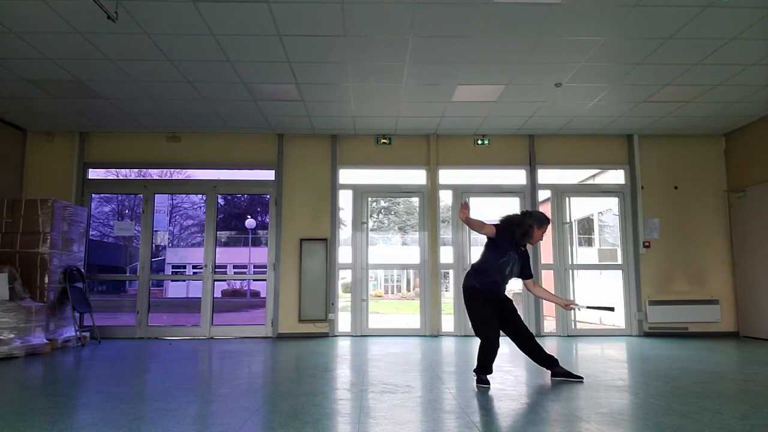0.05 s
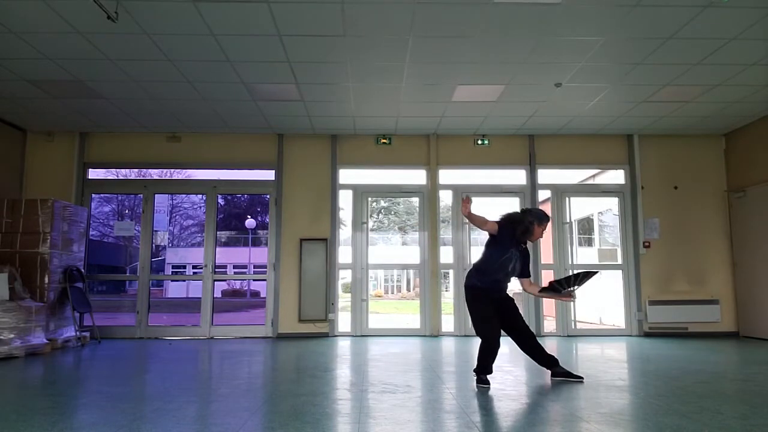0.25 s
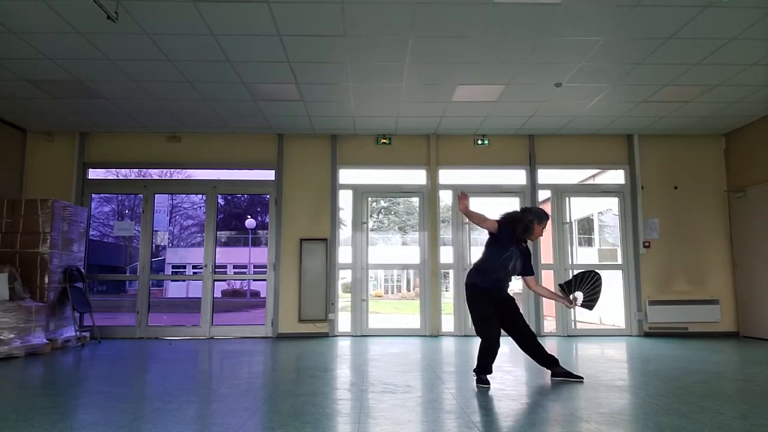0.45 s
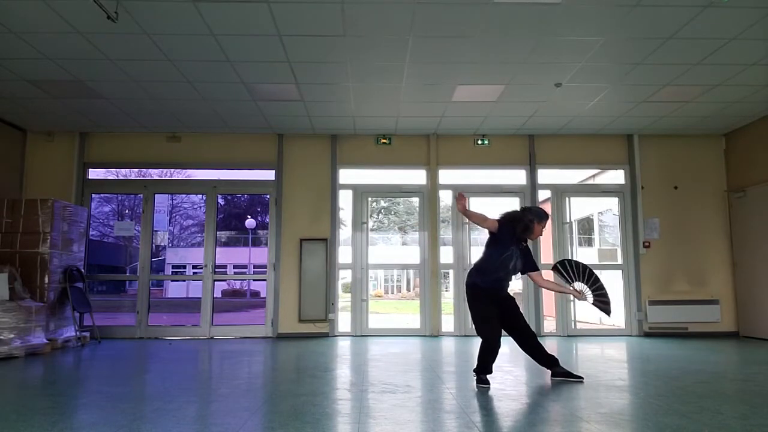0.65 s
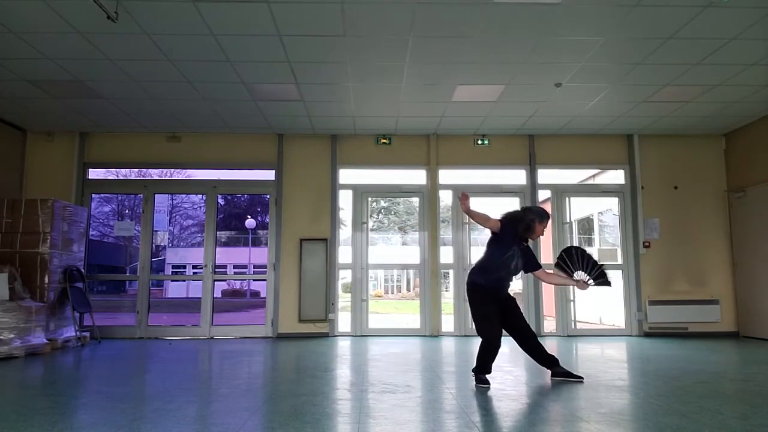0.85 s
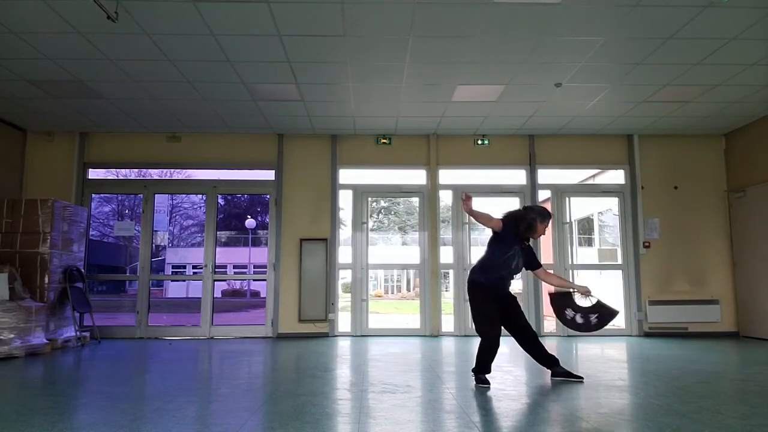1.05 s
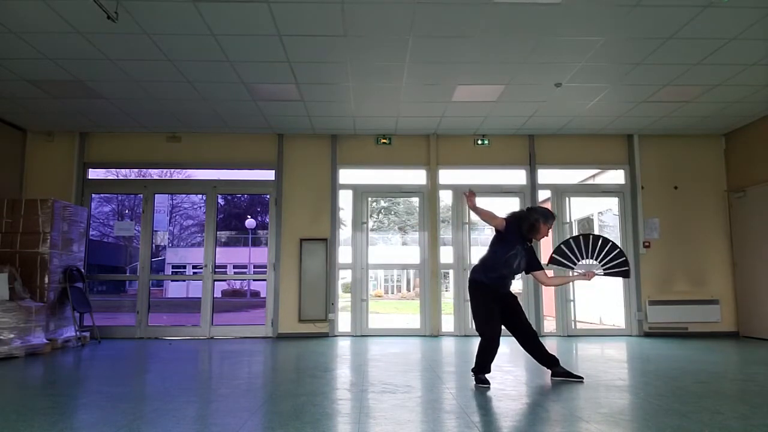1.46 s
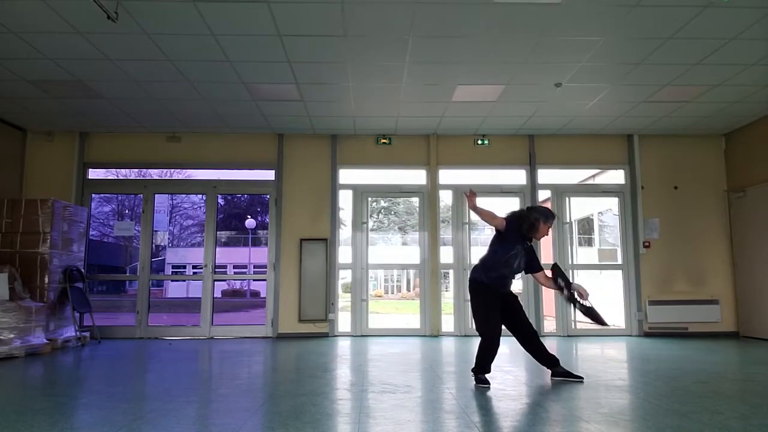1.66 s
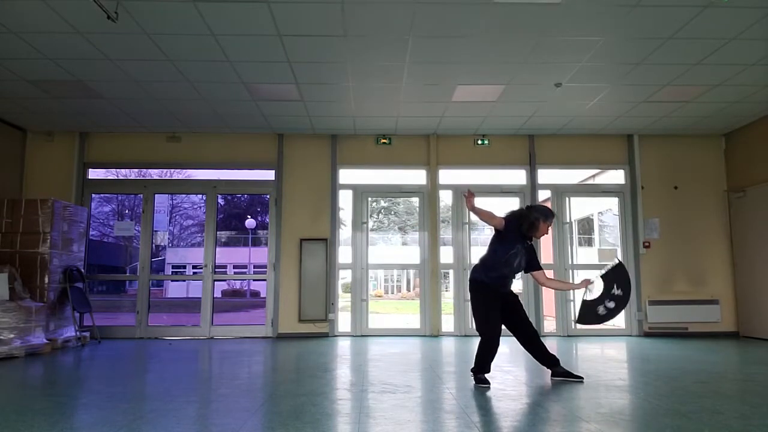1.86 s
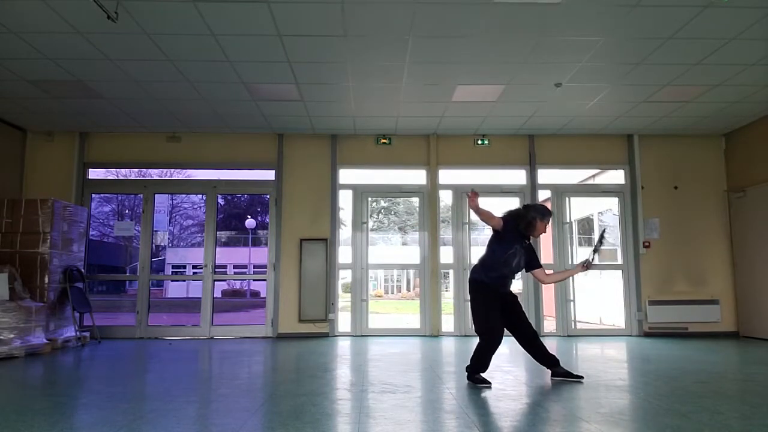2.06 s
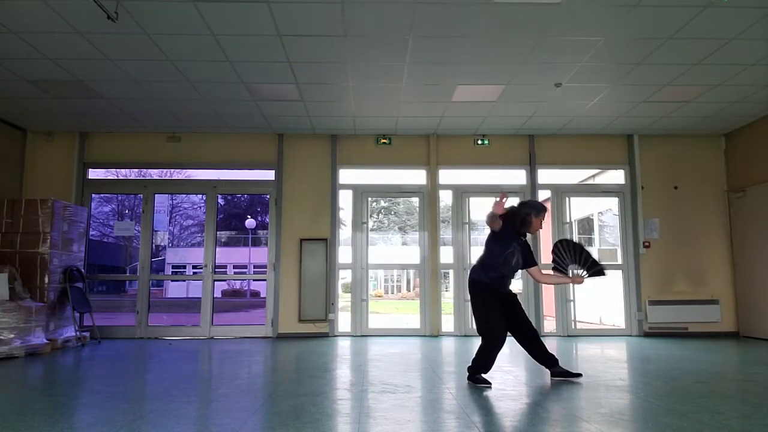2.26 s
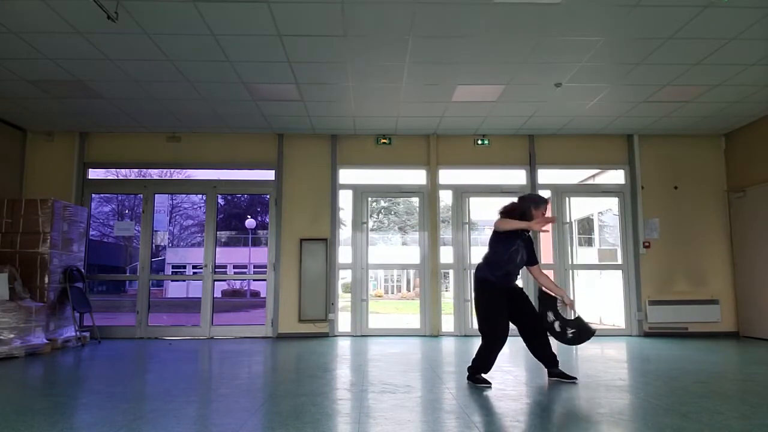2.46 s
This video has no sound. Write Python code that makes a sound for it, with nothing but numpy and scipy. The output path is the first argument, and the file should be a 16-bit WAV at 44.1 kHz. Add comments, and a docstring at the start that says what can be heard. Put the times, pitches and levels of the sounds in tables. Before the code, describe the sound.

A large folding fan snaps open at about 0.2 to 0.4 seconds, with a quick, loud run of rib clacks and a cloth rasp, ringing briefly in an empty hall. It then swishes and ticks very faintly, its cloth flapping softly at about 1.3 and 2.2 seconds. The fan is a few metres away, slightly right. A quiet low rumble continues underneath, with soft low bumps mostly after 1.9 seconds.

```python
"""A low steady rumble fills an empty hall, and almost at once a large folding fan is flicked open:
its ribs clack against their stops one after another and the cloth cracks taut.
The open fan is swung to and fro, swishing and ticking faintly, and its leaf flaps over twice.
The hall rings after each sound of the fan; a few soft low bumps lie underneath."""
import sys
import numpy as np
from scipy import signal
from scipy.fft import rfft, irfft
from scipy.io import wavfile
from scipy.ndimage import uniform_filter1d

SR = 44100
rng = np.random.default_rng(int(sys.argv[2]) if len(sys.argv) > 2 else 0)


def master_out(mix):
    """Clip the mix to full scale and print it as 16-bit PCM to the path in sys.argv[1]."""
    frames = np.transpose(np.atleast_2d(mix))
    ceiling = np.clip(frames, -1, 1)
    pcm = np.round(ceiling * 32767).astype(np.int16)
    wavfile.write(sys.argv[1], SR, pcm)


N = 110250
T = np.arange(N) / SR


def amp(db):
    return 10 ** (np.asarray(db) / 20)


def at_hz(points, hz):
    """Read a table on a log-frequency axis."""
    freqs, values = np.transpose(points)
    return np.interp(np.log(np.maximum(hz, 1)), np.log(freqs), values)


def click(start):
    """A unit impulse at a time in seconds."""
    out = np.full(N, 1e-18)
    out[int(np.clip(start * SR, 0, N - 1))] = 1
    return out


def delay(x, seconds):
    """The same sound, later."""
    return np.interp(T - seconds, T, x, left=0)


def ring(x, hz, t60):
    """A resonator: a unit click sets off a sine of height 1 that falls 60 dB in t60 seconds."""
    radius, angle = amp(-60 / (t60 * SR)), 2 * np.pi * hz / SR
    return signal.lfilter([0, np.sin(angle)], [1, -2 * radius * np.cos(angle), radius ** 2], x)


def burst(peak, rise, t60):
    """An envelope that swells up to its peak time and dies away."""
    out = np.zeros(N)
    near = slice(*np.searchsorted(T, [peak - 10 * rise, peak + 2 * t60]))
    age = T[near] - peak
    out[near] = np.exp(-(np.minimum(age, 0) / rise) ** 2 - np.log(1000) * np.maximum(age, 0) / t60)
    return out + 1e-12


def noise(spectrum):
    """Coloured noise of rms 1."""
    colour = amp(at_hz(spectrum, np.fft.rfftfreq(N, 1 / SR)))
    x = irfft(rfft(rng.standard_normal(N)) * colour, N)
    return x / x.std()


# The hall's stereo image. Each row: frequency in Hz, left-right correlation.
STEREO_LIKENESS = [(60, 0.99), (180, .93), (300, .7), (520, 0.84), (1100, 0.33), (2200, -.25), (5000, 0),
                   (12000, 0)]

def diffuse(spectrum, size):
    """Spectra of a left and a right noise, alike in the bass and unrelated in the treble."""
    hz = np.fft.rfftfreq(size, 1 / SR)
    alike = np.clip(at_hz(STEREO_LIKENESS, hz), -1, 1)
    mid, side = rfft(rng.standard_normal((2, size)))
    pair = np.sqrt((1 + alike) / 2) * mid + np.sqrt((1 - alike) / 2) * side * [[1], [-1]]
    return amp(at_hz(spectrum, hz)) * pair


# The two colours of the room tone. Each row: frequency in Hz, relative noise density in dB.
RUMBLE_COLOUR = [(25, -24.5), (48, -8), (72, -4), (115, -8), (165, -17.5), (245, -16.5), (330, -24.5),
                 (480, -36), (800, -44), (1500, -48.5), (5000, -66.5), (15000, -61)]
HISS_COLOUR = [(500, 6), (2000, 0.5), (6000, -9.5), (12000, -7)]
RUMBLE_DB, HISS_DB = -57.5, -80.5

def rumble():
    """The steady low bed of the building, with a faint hiss on top."""
    low = irfft(diffuse(RUMBLE_COLOUR, size=N), N)
    hiss = np.array([noise(HISS_COLOUR), noise(HISS_COLOUR)])
    return amp(RUMBLE_DB) * low / low.std() + amp(HISS_DB) * hiss


# Bumps under the action. Each row: start in seconds, level in dB.
LOW_BUMPS = [(0.026, -51.5), (1.923, -52), (2.202, -47), (2.335, -41.5)]

def bumps():
    """Soft pushes ring one deep, muffled note, like weight shifting on a floor."""
    pushes = sum(amp(db) * click(start) for start, db in LOW_BUMPS)
    return signal.lfilter(*signal.butter(2, 150, fs=SR), ring(pushes, hz=67.4, t60=0.18))


# Swings of the fan. Each row: centre and width in seconds, relative air and rustle levels in dB.
FAN_SWINGS = [(.175, 0.026, -69.5, -70.5), (0.824, 0.015, -75, -68.5), (1.205, .035, -63, -75),
              (1.26, .03, -93, -86), (1.314, 0.0034, -61.5, -80.5), (1.35, .03, -60.5, -74),
              (1.92, .06, -69, -84), (2.03, 0.048, -91, -80.5), (2.201, 0.05, -67.5, -80.5),
              (2.35, 0.032, -69, -85.5), (2.5, .025, -66.5, -74)]
# Dark air and crisp cloth. Each row: frequency in Hz, relative noise density in dB.
AIR_COLOUR = [(100, 3.5), (300, 9.5), (600, -6), (1000, -7), (2200, -10), (5000, -29), (15000, -39)]
RUSTLE_COLOUR = [(500, -5), (3000, 2.5), (5000, -1.5), (7500, -5.5), (11000, 7.5), (15500, -2)]

def swishes():
    """Air and cloth noise swell and fade with each swing."""
    air, rustle = noise(AIR_COLOUR), noise(RUSTLE_COLOUR)
    out = 0
    for centre, width, air_db, rustle_db in FAN_SWINGS:
        swell = np.exp(-0.5 * ((T - centre) / width) ** 2)
        out += swell * (amp(air_db - 2.5) * air + amp(rustle_db + 0.5) * rustle)
    return out


# Flaps of the leaf. Each row: start in seconds, level in dB, pop pitch in Hz, slap trim in dB,
# slap low-pass in Hz, slap T60 in seconds.
LEAF_FLAPS = [(.200, -42.5, 260, 3, 2800, 0.027), (.211, -32, 407, -2, 1100, 0.058),
              (1.3275, -34, 164, -13.5, 2192, 0.028), (1.332, -40, 214.3, 3, 2486, 0.019),
              (1.335, -50, 299, 17, 5990, 0.02), (1.355, -38.5, 280.5, -25, 1983, 0.04),
              (1.366, -48.5, 408, 4, 6000, 0.058), (1.390, -50.5, 389.7, 9, 2990, 0.049),
              (2.183, -60, 187.2, -3.5, 2200, .06), (2.2012, -37, 233, -13.5, 1211, 0.064)]
# The slap's colour. Each row: frequency in Hz, relative noise density in dB.
SLAP_COLOUR = [(150, -1), (420, -2), (650, -5), (1100, 2), (1700, -5.5), (3200, -16.5), (4600, -23),
               (6000, -34), (15000, -37)]

def flaps():
    """The leaf bellies over with a low pop and a dull slap."""
    cloth = noise(SLAP_COLOUR)
    pops = slaps = 0
    for start, db, pop_hz, slap_db, bright_hz, slap_t60 in LEAF_FLAPS:
        pops += amp(db) * ring(click(start), pop_hz, t60=0.03)
        slap = amp(db + slap_db - 4.5) * cloth * burst(start, rise=0.001, t60=slap_t60)
        slaps += signal.lfilter(*signal.butter(2, bright_hz, fs=SR), slap)
    return signal.sosfilt(signal.butter(2, [110, 900], "band", fs=SR, output="sos"), pops) + slaps


# Tugs on the cloth. Each row: peak time in seconds, relative level in dB, rise and T60 in seconds.
CLOTH_RASPS = [(0.204, -65, .003, 0.6), (.247, -40, .002, 0.26), (.291, -37.5, .004, 0.21),
               (.326, -24.5, 0.0012, 0.03), (.349, -35, .004, 0.02), (0.3635, -35, .002, 0.019)]
# The rasp's colour. Each row: frequency in Hz, relative noise density in dB.
RASP_COLOUR = [(100, -26), (500, -1.5), (1500, -6), (3000, 10), (5500, 0.5), (7500, -8), (11000, -1.5),
               (15500, -5.5)]
RASP_GRAIN_DB = 2

def rasps():
    """The cloth gives bright, grainy rasps as its pleats pull taut."""
    flicker = uniform_filter1d(rng.standard_normal(N), size=20)
    grain = amp(RASP_GRAIN_DB * np.tanh(flicker / flicker.std()))
    tugs = sum(amp(db + 5.5) * burst(peak, rise, t60) for peak, db, rise, t60 in CLOTH_RASPS)
    return noise(RASP_COLOUR) * grain * tugs


# Ribs hitting their stops. Each row: start in seconds, level in dB, the rib's own pitch in Hz,
# contact hardness as a low-pass in Hz, rebound in seconds, thump trim in dB, left minus right in dB.
RIB_HITS = [(0.2375, -7.5, 1020, 3770, 0.00065, -12, -6), (0.2449, -7, 1150, 4044, 0.00071, 7, -2.5),
            (0.2685, -2, 1720, 2976, 0.00079, 8, -5.5), (0.2881, -25, 915, 2484, 0.00029, 14, -4.5),
            (.2895, -15.5, 1700, 3215, 0.00036, 23.5, -8.5), (0.3074, -8, 1400, 4000, .00075, 2, -4.5),
            (0.3226, -5.5, 1350, 4200, 0.00071, 2.5, -4), (0.3419, -4.5, 3164, 6500, .00063, -5, -3),
            (0.3588, 0, 1456, 4600, .0008, 3, -4.5), (0.3733, -3.5, 1700, 2657, 0.00051, -8.5, -2)]
# The clack and thump that all ribs share. Each row: frequency in Hz, gain in dB, T60 in seconds.
CLACK_MODES = [(972.22, -6, 0.0062), (1490, -17, 0.015), (1930, -8, 0.005), (2450, 0, 0.0023),
               (4000, -18, 0.0034), (4850, -15.5, .005)]
THUMP_MODES = [(250, -27.5, .03), (432, -17, .02)]
FIRST_TOUCH_DB, CHATTER_DB, OWN_RING_DB = -10.5, -24, -3

def rib(start, db, pitch_hz, hard_hz, rebound_s, thump_db, pan_db):
    """A rib touches lightly, seats and chatters; it rings briefly and jerks a thump from its pleat."""
    seated = start + rebound_s
    blow = amp(FIRST_TOUCH_DB) * click(start) + click(seated)
    chatter = amp(CHATTER_DB) * rng.standard_normal(N) * burst(seated, rise=0.00017, t60=0.014)
    contact = signal.sosfilt(signal.butter(4, hard_hz, fs=SR, output="sos"), blow + chatter)
    clack = amp(OWN_RING_DB) * ring(contact, pitch_hz, t60=0.007)
    clack += sum(amp(gain) * ring(contact, hz, t60) for hz, gain, t60 in CLACK_MODES)
    clack = signal.lfilter(*signal.butter(1, 800, "high", fs=SR), clack)
    thump = amp(thump_db) * sum(amp(gain) * ring(blow, hz, t60) for hz, gain, t60 in THUMP_MODES)
    thump = signal.sosfilt(signal.butter(3, [183, 1500], "band", fs=SR, output="sos"), thump)
    pan = amp([[pan_db / 2], [-pan_db / 2]])
    return amp(db) * (clack * pan + thump)


# Bounces off floor, ceiling and wall. Each row: left and right delays in seconds, level in dB.
EARLY_ECHOES = [(.0036, .0033, -13.5), (.0055, 0.0092, -14.5), (.0228, .0219, -19)]
# The hall's standing waves. Each row: frequency in Hz, relative gain in dB, left minus right in dB.
STANDING_WAVES = [(114.23, 13, -1), (201.8, 1.5, 1.5), (250.4, 17.5, 0), (380.6, 10, 5), (421.3, 9, -1.5),
                  (466, 6.5, 7)]
STANDING_T60_S = 0.46

def reflections(x):
    """The hall throws back early echoes and hums in a few low standing waves."""
    unity = 2 * np.log(1000) / (STANDING_T60_S * SR)  # brings each resonance to a gain of 1
    out = sum(amp(db) * np.array([delay(x, left), delay(x, right)]) for left, right, db in EARLY_ECHOES)
    for hz, db, pan_db in STANDING_WAVES:
        gains = amp([[db + pan_db / 2], [db - pan_db / 2]])
        out += gains * unity * ring(x, hz, STANDING_T60_S)
    return out


# The length of the hall's tail. Each row: band centre in Hz, T60 in seconds.
TAIL_DECAY = [(100, 0.73), (250, .63), (1000, 0.59), (2200, .68), (4000, .63), (7500, 0.57), (11000, .43),
              (16000, 0.32)]
# The tail's colour. Each row: frequency in Hz, gain in dB.
TAIL_COLOUR = [(80, -2), (200, 1), (400, 1.5), (600, 6.5), (850, 3), (1300, -5), (2000, 1.5), (2800, -1),
               (5000, 0), (9000, 1.5), (15000, 3)]
PREDELAY_S, TAIL_BUILD_S = 0.002995, 0.003

def reverberation(x):
    """A diffuse tail that dies band by band, different for every spot the sound comes from."""
    hz, t = np.fft.rfftfreq(SR, 1 / SR), T[:SR]
    field = diffuse(TAIL_COLOUR, size=SR)
    centres, t60s = np.transpose(TAIL_DECAY)
    tail = 0
    for t60, share in zip(t60s, np.eye(len(centres))):
        band = irfft(field * np.interp(hz, centres, share), SR)
        rate = np.log(1000) / t60
        tail += band * np.exp(-rate * t) * np.sqrt(2 * rate / SR)  # same energy at any decay rate
    tail *= np.clip((t - PREDELAY_S) / TAIL_BUILD_S, 0, 1)
    return signal.fftconvolve(tail, x[None], axes=1)[:, :N]


# Tiny bright contacts. Each row: peak time in seconds, level in dB.
RIB_TICKS = [(1.13, -71.5), (1.19, -72), (1.581, -70), (1.815, -75), (1.945, -72), (2.051, -67),
             (2.284, -74.5), (2.34, -74)]

def ticks():
    """The ribs tick lightly against each other as the fan turns."""
    touches = sum(amp(db) * burst(peak, rise=0.0006, t60=0.023) for peak, db in RIB_TICKS)
    return noise(RUSTLE_COLOUR) * touches


FLAP_SEND_DB, RUSTLE_SEND_DB = 2, 1.5  # hall sends, relative to the ribs
LEFT_LAG_S = 0.00002  # the fan is nearer the right microphone

def scene():
    """The fan, a few metres away and a little to the right; each rib sounds from its own spot."""
    clacks = [rib(*hit) for hit in RIB_HITS]
    flapping = flaps()
    rustling = rasps() + swishes() + ticks()
    left, right = sum(clacks) + flapping + rustling
    direct = np.array([delay(left, LEFT_LAG_S), right])
    sends = [clack.mean(axis=0) for clack in clacks]
    sends += [amp(FLAP_SEND_DB) * flapping, amp(RUSTLE_SEND_DB) * rustling]
    hall = reflections(sum(sends)) + sum(reverberation(send) for send in sends)
    return direct + hall + bumps() + rumble()


SOFT_CEILING, LOW_CUT_HZ, HIGH_CUT_HZ = 1.2, 30, 15900

def record(dry):
    """The highest peaks are rounded; the deepest bass and the very top are cut."""
    rounded = SOFT_CEILING * np.tanh(dry / SOFT_CEILING)
    trimmed = signal.lfilter(*signal.butter(2, LOW_CUT_HZ, "high", fs=SR), rounded)
    return signal.sosfilt(signal.ellip(10, 0.1, 80, HIGH_CUT_HZ, fs=SR, output="sos"), trimmed)


dry = scene()
out = record(dry)
master_out(out)
```